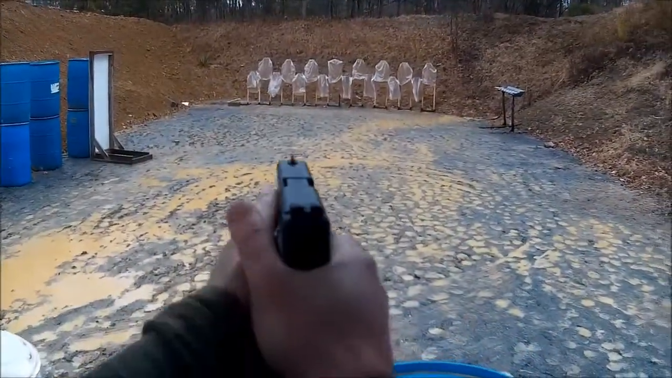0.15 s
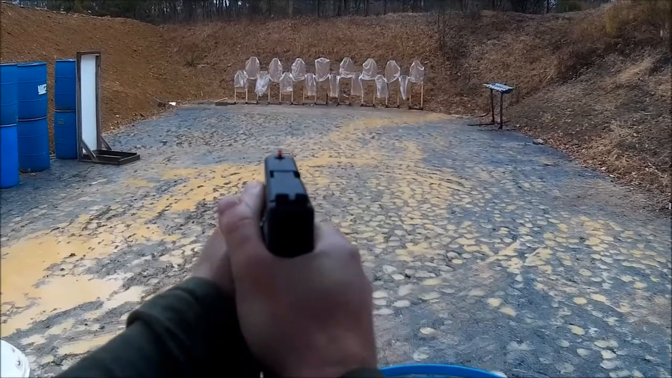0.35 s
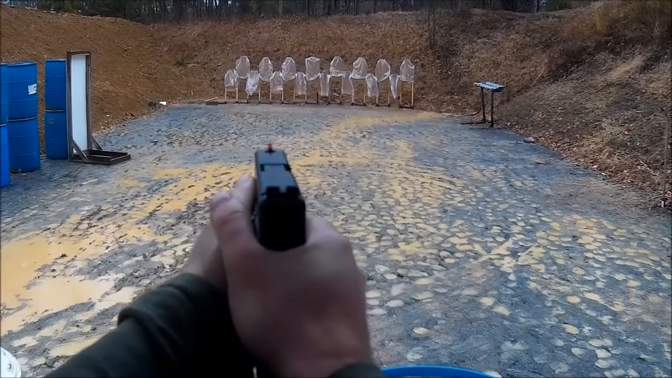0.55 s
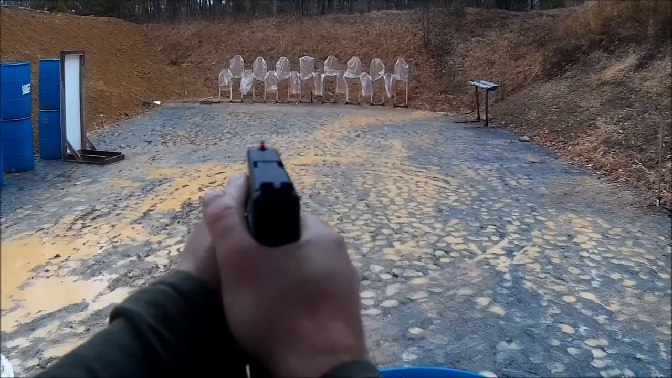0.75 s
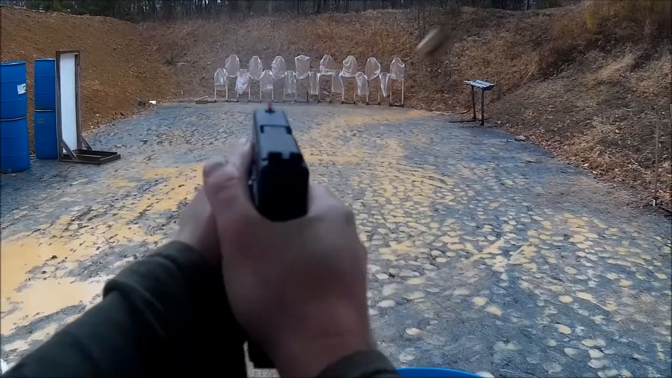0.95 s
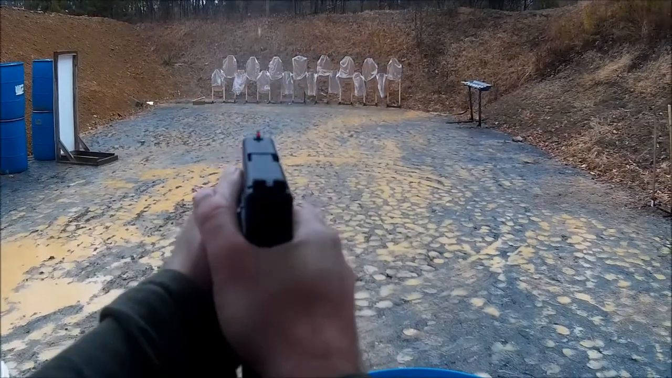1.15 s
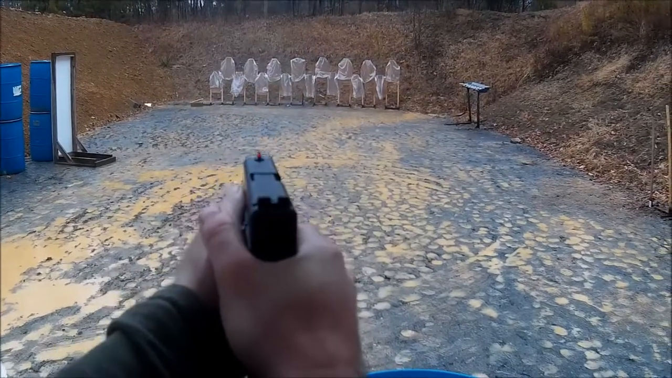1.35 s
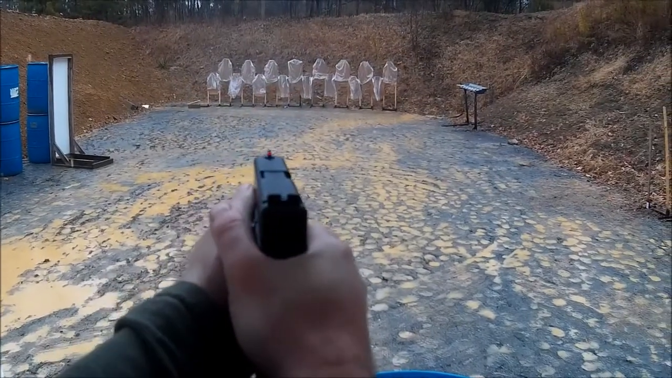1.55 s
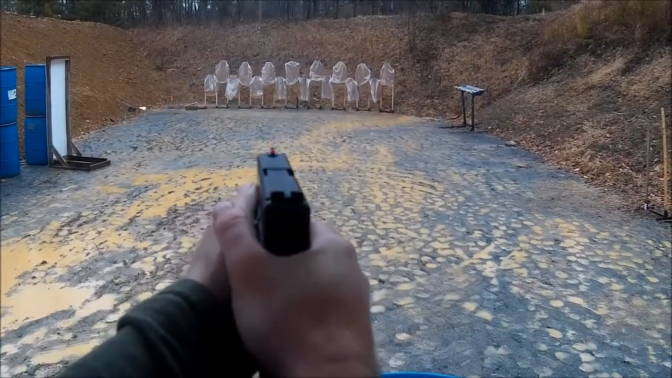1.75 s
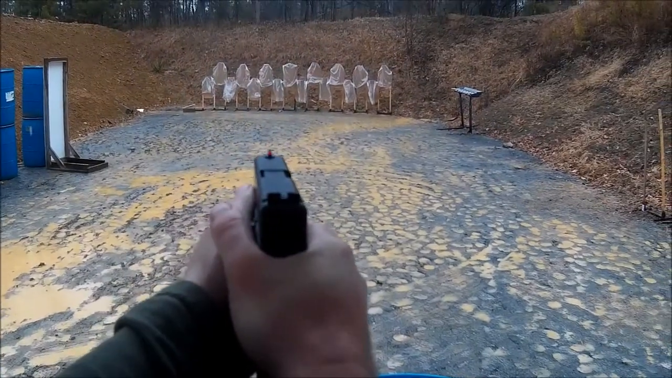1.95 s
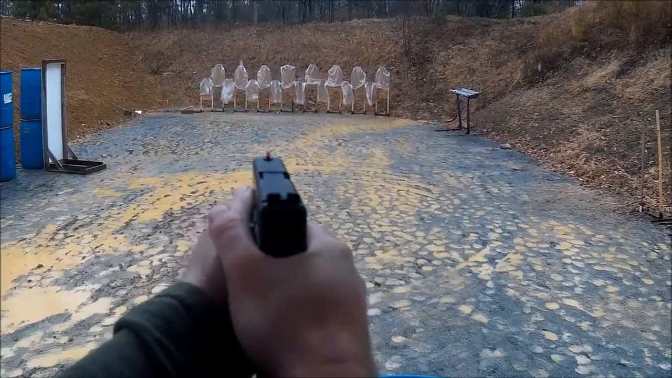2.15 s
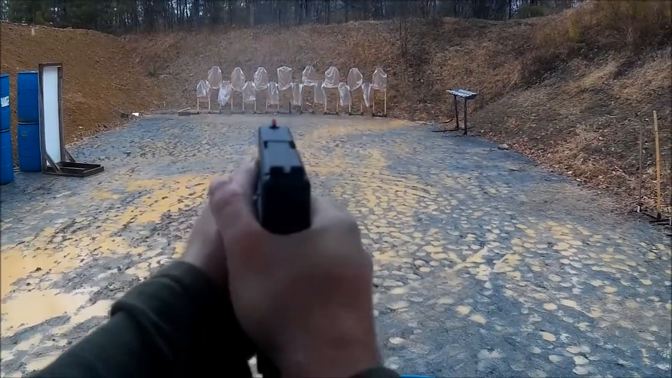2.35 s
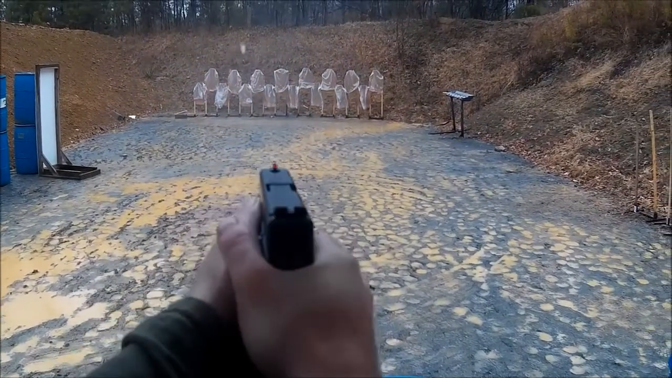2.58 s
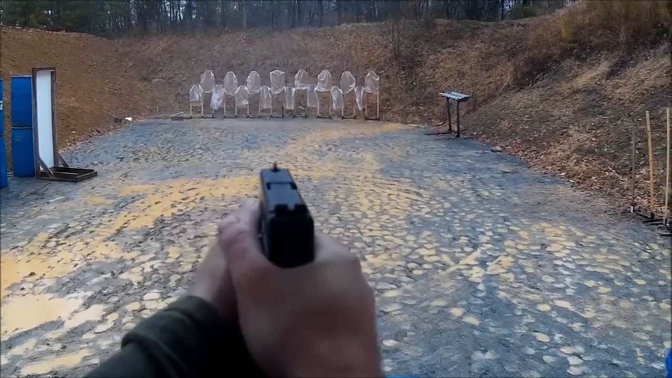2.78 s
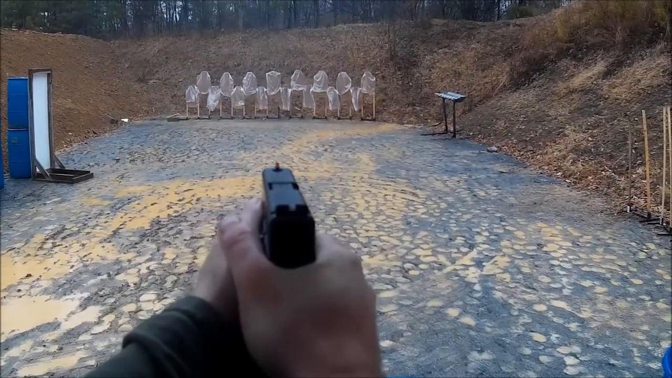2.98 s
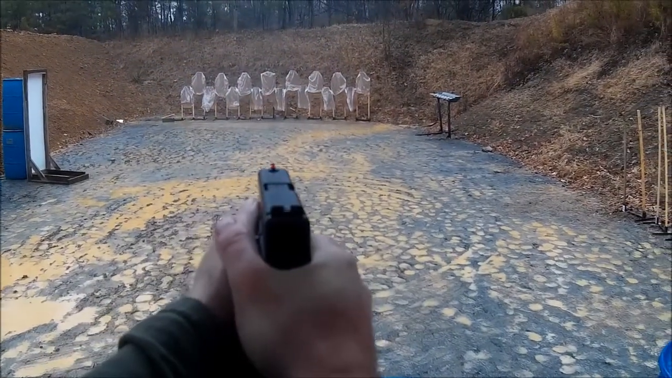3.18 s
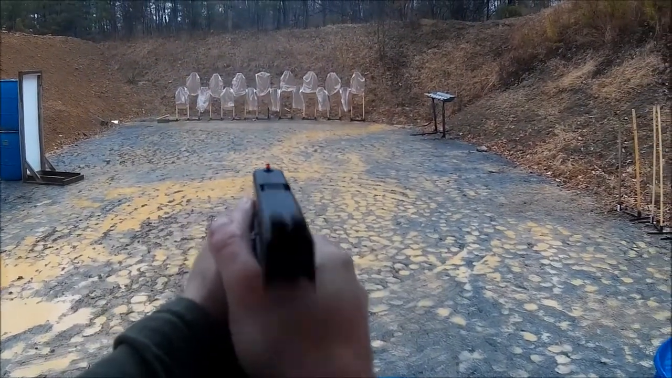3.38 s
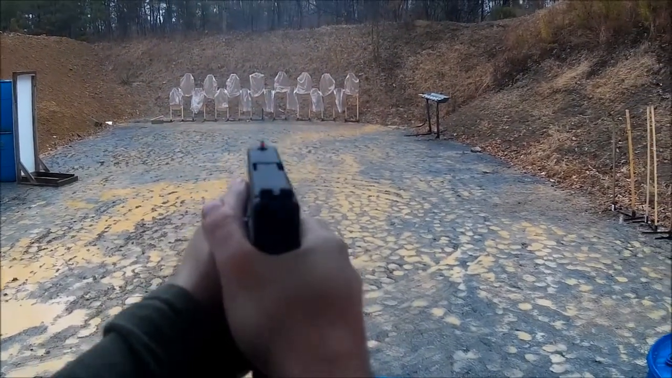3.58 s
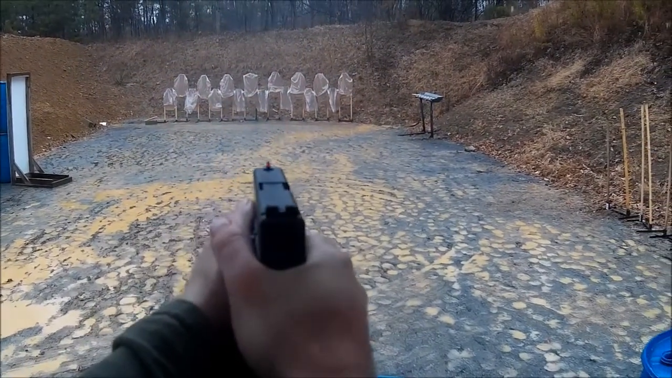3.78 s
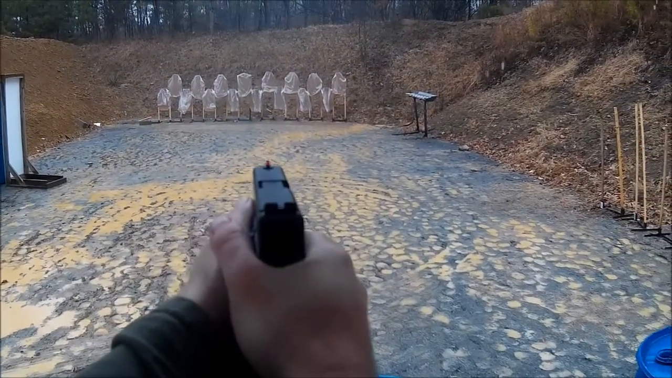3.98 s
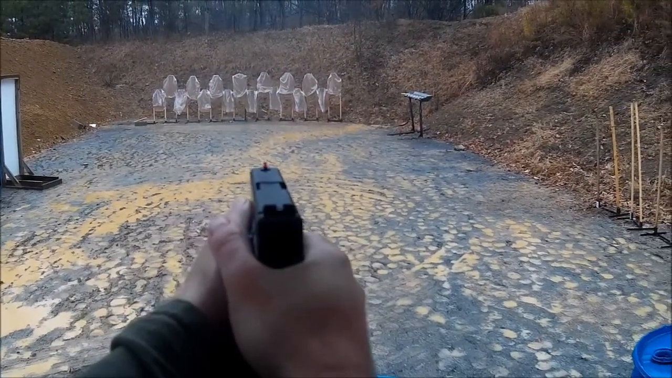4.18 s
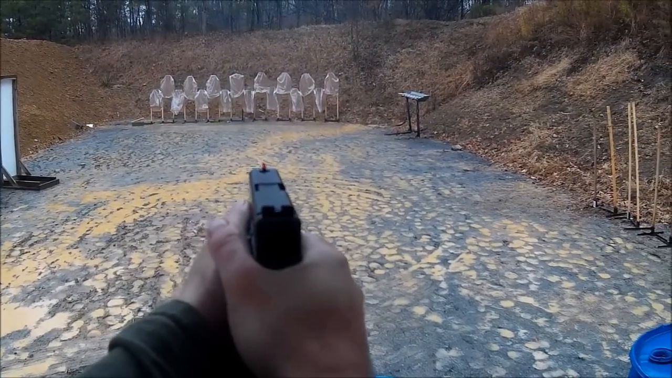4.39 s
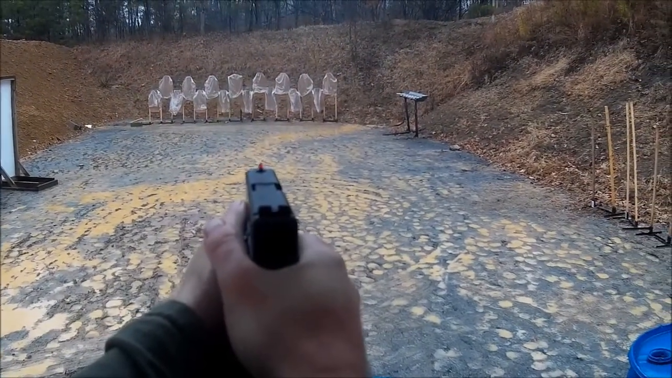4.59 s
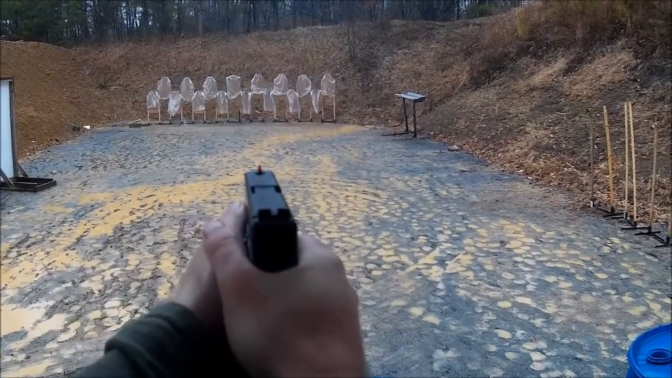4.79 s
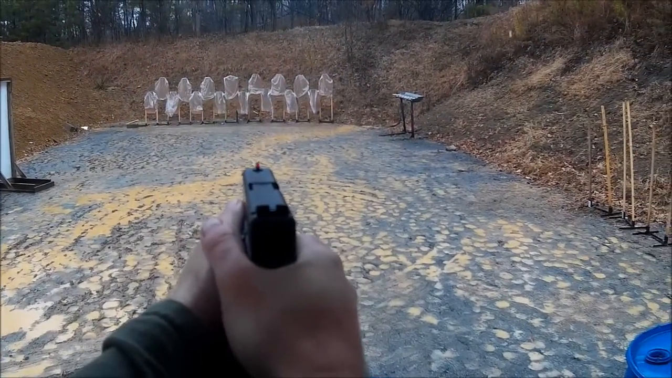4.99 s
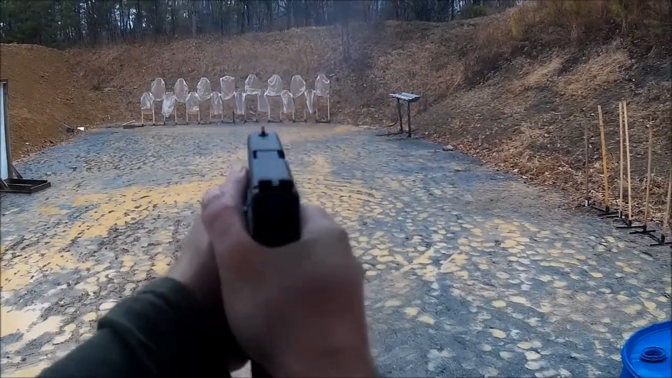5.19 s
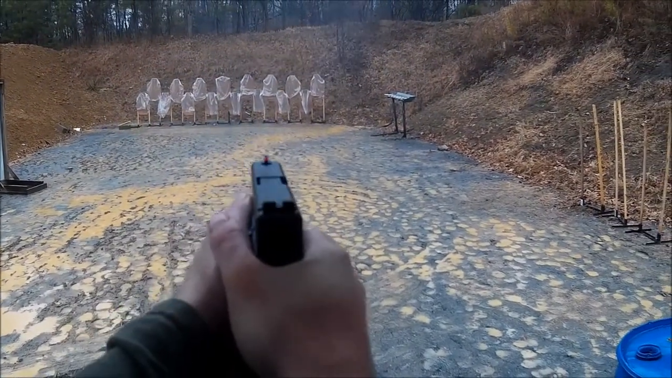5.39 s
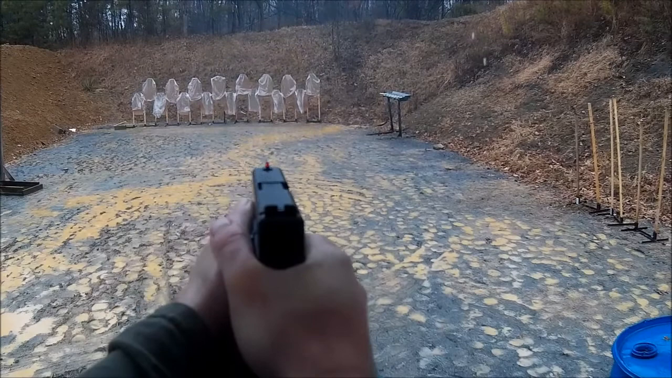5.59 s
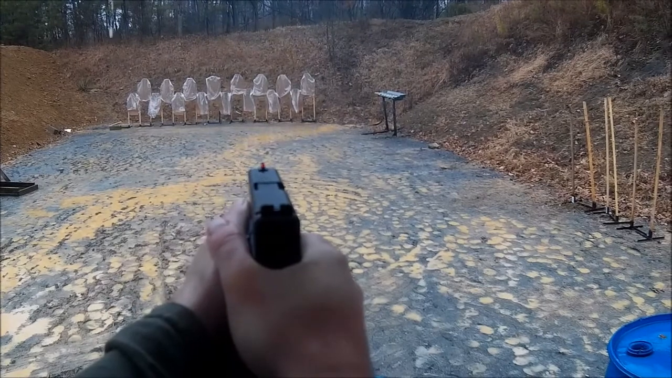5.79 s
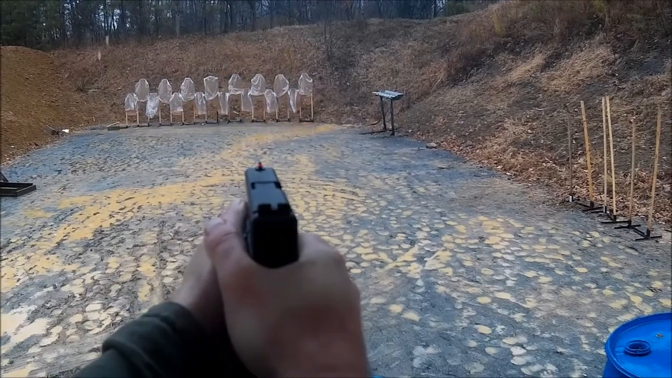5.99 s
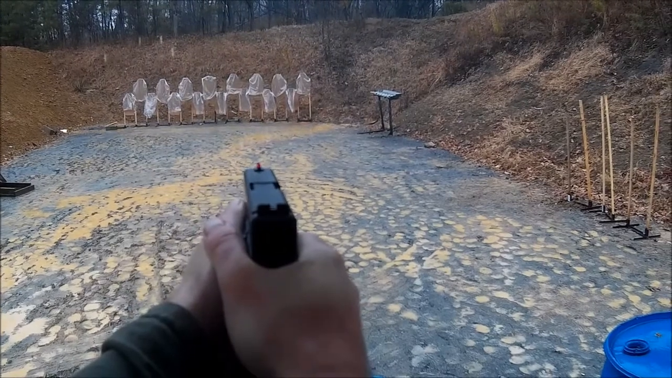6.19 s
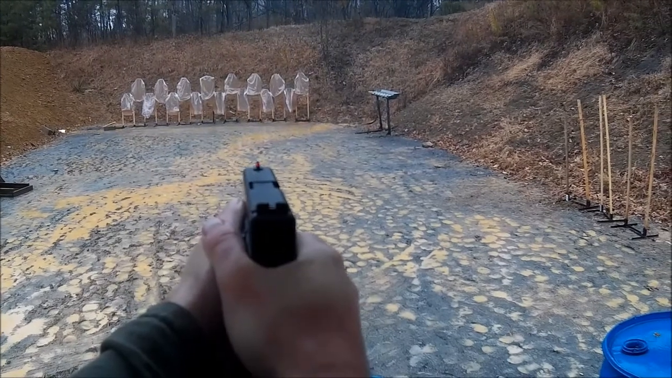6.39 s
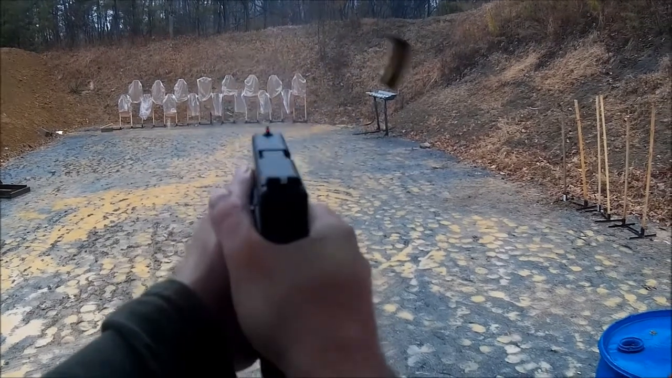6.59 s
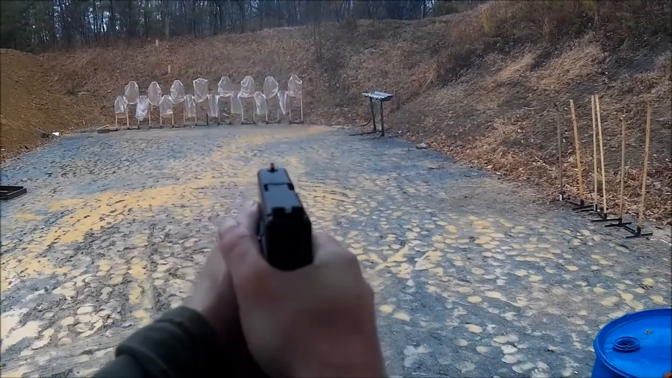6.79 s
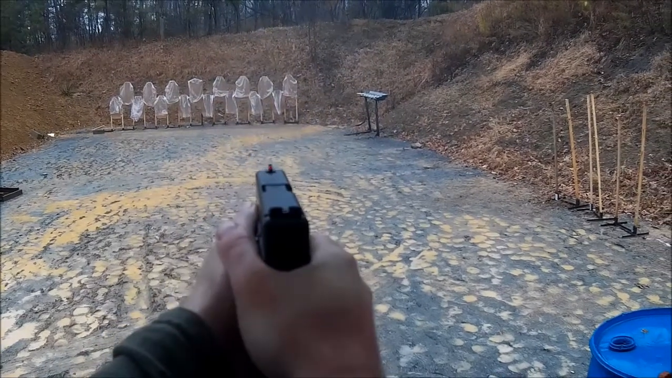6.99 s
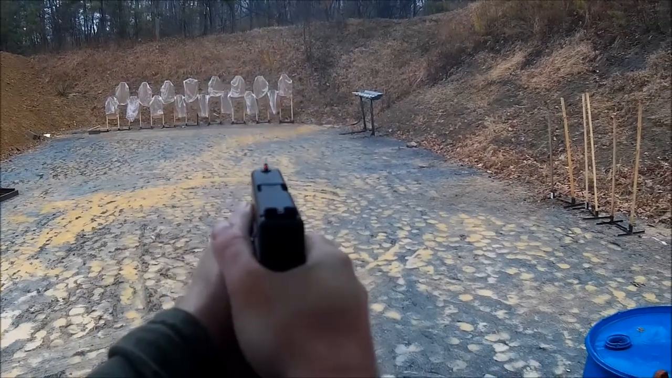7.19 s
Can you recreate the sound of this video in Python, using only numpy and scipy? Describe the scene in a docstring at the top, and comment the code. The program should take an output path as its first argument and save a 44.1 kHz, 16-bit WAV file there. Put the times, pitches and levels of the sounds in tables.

```python
"""A pistol fires five times in an earth-walled range bay, an arm's length from a microphone each blast overloads.
Each shot is a pressure pulse with damped ringing; banks, backstop and woods answer with shaped noise echoes.
A second gun beyond the side berm is a low-passed thump with dull returns, treetop hiss and a roll.
The trigger clicks as coloured noise over damped sines, and small noise bursts tick on the gravel.
Beneath lie a steady outdoor hush, a faint crackle and an uneven low rustle."""
import sys
import numpy as np
from scipy import signal
from scipy.fft import rfft, irfft, next_fast_len
from scipy.io import wavfile
from scipy.ndimage import uniform_filter1d, map_coordinates

SR = 44100
rng = np.random.default_rng(int(sys.argv[2]) if len(sys.argv) > 2 else 0)


def log_audio(samples):
    """Write samples as a 16-bit WAV file to the path given in sys.argv[1]."""
    # one column per channel
    frames = np.atleast_2d(samples).T
    # limit to full scale, then quantise
    limited = np.clip(frames, -1, 1)
    pcm = np.round(limited * 32767).astype(np.int16)
    wavfile.write(sys.argv[1], SR, pcm)


N = 319725
AGE = np.arange(int(1.4 * SR)) / SR  # time since a sound began [s]


def amp(db):
    """Logarithmic level: decibels to gain."""
    return 10 ** (np.asarray(db) / 20)


def add(track, s, sound):
    """Superposition: mix a sound into the track from time s, cut at the end of the track."""
    part = track[round(s * SR):][:len(sound)]
    part += sound[:len(part)]


def fade(t60):
    """Exponential damping: 60 dB down after t60 seconds."""
    return np.exp(-np.log(1000) * AGE / t60)


def rising(attack, start=0):
    """Smooth onset: a step from 0 to 1, beginning at start [s]."""
    return 1 - np.exp(-(np.maximum(AGE - start, 0) / attack) ** 2)


def swell(db, attack, hold, t60, delay=0):
    """Echo envelope: arrives after delay, builds up, holds until hold seconds after arrival, then decays."""
    dying = np.maximum(AGE - delay - hold, 0)
    return amp(db - 60 * dying / t60) * rising(attack, delay)


def wobble(rate, size=len(AGE)):
    """Random modulation: a smooth curve through rate random knots a second."""
    knots = rng.standard_normal(1024)
    return map_coordinates(knots, [np.arange(size) / SR * rate], mode="wrap")


# resonances and notches of the microphone housing: (frequency [Hz], width [Hz], gain [dB])
HOUSING_RESONANCES = [(243, 34, 3), (436, 42, -4.5), (610, 210, 4), (790, 60, -3.5), (1031, 72, 7.5),
                      (1590, 100, -4.5), (1976, 120, 7), (6300, 560, 4), (8400, 450, 2.5)]


def colour(tone, size, housing_share=1):
    """Linear filtering: gain at each frequency from a tone curve plus a share of the housing resonances."""
    hz = np.fft.rfftfreq(size, 1 / SR)
    points, db = np.transpose(tone)
    housing = sum(lift * np.exp(-.5 * ((hz - centre) / width) ** 2)
                  for centre, width, lift in HOUSING_RESONANCES)
    curve = np.interp(np.log(hz + 1), np.log(points + 1), db)
    return amp(curve + housing_share * housing)


def noise(tone, size=len(AGE), housing_share=1):
    """Filtered random noise: white noise given a colour, then scaled to rms 1."""
    spectrum = rfft(rng.standard_normal(size))
    x = irfft(spectrum * colour(tone, size, housing_share), size)
    return x / x.std()


def ringing(modes):
    """Modal superposition: damped sines struck together."""
    return sum(amp(db) * fade(t60) * np.sin(2 * np.pi * hz * AGE) for hz, db, t60 in modes)


def blast(push, rise):
    """Blast wave: a quick rise, a push lasting push seconds, then a longer suction; the peak is 1."""
    u = AGE / push
    wave = (1 - u) * np.exp(-u) * rising(rise)
    return wave / wave.max()


def echoes(level, tone, alike, lumpy_db, spiky_db, count):
    """Diffuse scattering: one echo per shot, clumped by banks, spiked by trunks, its pattern partly repeated."""
    arrived = rising(attack=0.0007) * (level > amp(-90))
    gain = level * amp(lumpy_db * wobble(rate=120))
    trunks = amp(spiky_db * np.clip(wobble(rate=700), -2, 2))
    # the ground stays put: alike is the share of the scattering power common to all shots
    share = np.clip(alike, 0, 1)
    common = rng.standard_normal(len(AGE))
    own = rng.standard_normal((count, len(AGE)))
    paths = np.sqrt(share) * common + np.sqrt(1 - share) * own
    # even a short burst holds every frequency: level it out before it takes its colour
    spectrum = rfft(gain * trunks * paths)
    spectrum /= np.sqrt(np.abs(uniform_filter1d(np.abs(spectrum) ** 2, size=300)) + 1e-20)
    echo = irfft(spectrum * colour(tone, len(AGE)), len(AGE)) * arrived
    # each echo keeps the energy of its envelope
    return echo * np.linalg.norm(gain) / np.linalg.norm(echo, axis=1, keepdims=True)


# spectrum of the outdoor hush: (frequency [Hz], relative level [dB])
HUSH_TONE = [(15, -40), (25, -9.5), (43, -18.5), (59, -2), (79, -4.5), (169, -5.5), (313, -5), (445, -12.5),
             (826, -17), (1020, -10.5), (1660, -26), (1850, -16), (4260, -29), (9550, -32), (15500, -32)]


def air():
    """Stationary noise: a quiet outdoor hush with a faint crackle and an uneven low rustle."""
    ticks = (rng.random(N) < 45 / SR) * rng.random(N)  # 45 a second on average
    crackle = signal.fftconvolve(ticks, fade(0.012))[:N] * noise(GRIT_TONE, size=N)
    rustle = noise(THUD_TONE, size=N) * amp(4.4 * wobble(rate=16, size=N))
    hush = noise(HUSH_TONE, size=N, housing_share=0)
    return amp(-56.5) * hush + amp(-52) * crackle + amp(-64.5) * rustle


# shots beyond the side berm: (time [s], thump level [dB], echo level [dB])
NEIGHBOUR_SHOTS = [(0.143, -17, -1.5), (1.2212, -12, -0.5), (1.908, -17.5, -2.5), (3.096, -17.5, -3)]
# modes of the blast, before the berm's shadow filter: (frequency [Hz], level [dB], t60 [s])
THUMP_MODES = [(82, -2, 0.086), (160, -13, 0.077), (321, -4, 0.062), (594, -13, 0.027), (940, -11, 0.02)]
# dull returns from far banks: (delay [s], level [dB])
FAR_RETURNS = [(0.149, -22), (.226, -21), (0.391, -29.5)]
# modes of those banks: (frequency [Hz], level [dB], t60 [s])
BANK_MODES = [(300, -1, .07), (440, -2.5, .05), (605, -6.5, 0.031)]
# spectrum of the neighbour's brush and woods echoes: (frequency [Hz], relative level [dB])
FAR_WOODS_TONE = [(24, -47.5), (40, -19), (113, -12), (313, 0.5), (824, -7.5), (1000, -11.5), (1570, -15),
                  (2010, -15.5), (2920, -20.5), (5160, -32), (5700, -27.5), (9360, -49), (15000, -52.5)]
# spectrum of the treetop echo: (frequency [Hz], relative level [dB])
TREETOP_TONE = [(60, -20.5), (250, -4.5), (600, -1), (1000, -3.5), (1600, -11.5), (2100, -6), (4000, -15),
                (6300, -17.5), (9000, -31), (11000, -37.5), (15000, -44)]
TREES_DELAY = 0.009  # extra travel time by way of the trees [s]


def neighbour():
    """Diffraction: only a dull thump bends over the berm; treetops return the treble later, then woods roll."""
    count = len(NEIGHBOUR_SHOTS)
    shadow = signal.butter(8, 1000, fs=SR, output="sos")  # low-pass at 1000 Hz
    thump = signal.sosfilt(shadow, blast(push=0.0012, rise=0.00053) + ringing(THUMP_MODES))
    returns = np.zeros(len(AGE))
    for delay, db in FAR_RETURNS:
        add(returns, delay, amp(db) * ringing(BANK_MODES) * rising(0.001))
    # brush on top of the berm scatters a little of the thump at once
    brush = swell(db=-23, attack=0.0053, hold=0.024, t60=0.2)
    spills = echoes(brush, FAR_WOODS_TONE, alike=0.47, lumpy_db=3.3, spiky_db=5.0, count=count)
    treetops = swell(db=-18.0, attack=.02, hold=.07, t60=0.37)
    bright = echoes(treetops, TREETOP_TONE, alike=.7, lumpy_db=0.6, spiky_db=1.3, count=count)
    # the edge of the woods holds and falls; the deep woods roll on
    edge = swell(db=-33.5, attack=.035, hold=0.26, t60=.85)
    deep_woods = swell(db=-53, attack=.3, hold=.55, t60=1.7)
    rolls = echoes(edge + deep_woods, FAR_WOODS_TONE, alike=0.53, lumpy_db=1.1, spiky_db=1.0, count=count)
    out = np.zeros(N)
    for (s, thump_db, echo_db), spill, hiss, roll in zip(NEIGHBOUR_SHOTS, spills, bright, rolls):
        add(out, s, amp(thump_db) * (thump + spill) + amp(echo_db) * returns)
        add(out, s + TREES_DELAY, amp(thump_db) * hiss + amp(echo_db) * roll)
    return out


# stray of each ring mode from shot to shot as the gun and hands move [dB], [share of its pitch]
RING_SCATTER_DB, RING_DETUNE = 2, 0.02


def strayed(modes):
    """Modal perturbation: the same modes, each a little off in pitch and level."""
    chance = rng.standard_normal((len(modes), 2))
    return [(hz * (1 + RING_DETUNE * a), db + RING_SCATTER_DB * b, t60)
            for (hz, db, t60), (a, b) in zip(modes, chance)]


# the pistol's shots: (time [s], strength [dB])
PISTOL_SHOTS = [(0.879, -1), (2.2286, -1), (3.3965, -1.5), (5.0403, -1), (6.44, -1)]
# mean modes that ring close by: (frequency [Hz], level [dB], t60 [s])
RING_MODES = [(219.7, -1.5, 0.093), (502.5, 13, 0.041), (622, 3, 0.046), (981, 11, 0.045),
              (1302, 2.5, 0.034), (1979, 9.5, 0.042), (3298, 4, 0.039)]
# single hard reflections inside the bay: (delay [s], level [dB])
BAY_SLAPS = [(.0305, -10), (.0428, -13)]
# spectrum of the scatter off the ground at the shooter's feet: (frequency [Hz], relative level [dB])
FLASH_TONE = [(40, -6.5), (230, -4.5), (750, -4.5), (1100, -4), (2000, -8), (3500, -10), (5000, -15),
              (8000, -25), (15000, -37)]
# spectrum of the near wall and the wash: (frequency [Hz], relative level [dB])
BAY_TONE = [(30, -21), (130, -20.5), (200, -6), (270, 0), (350, -8.5), (450, -12.5), (600, -11.5),
            (1050, -12), (1400, -15), (2200, -17.5), (3400, -18), (6300, -23), (10000, -37.5), (15500, -52)]
# spectrum of the bare earth of backstop and far wall: (frequency [Hz], relative level [dB])
BACKSTOP_TONE = [(24, -38.5), (40, -35), (59, -14.5), (257, -2.5), (422, -9), (541, -8.5), (804, -17),
                 (956, -13.5), (1650, -13.5), (1960, -18.5), (3560, -30.5), (6460, -31), (15000, -56.5)]
# spectrum of the woods: (frequency [Hz], relative level [dB])
WOODS_TONE = [(24, -63), (40, -28.5), (156, -24.5), (206, -5.5), (270, -1), (443, -4), (627, -3.5),
              (784, -9), (1060, -10.5), (1570, -14.5), (2010, -17), (2340, -18.5), (3650, -27), (5850, -31),
              (15000, -68.5)]
# travel times of the echoes from the far side wall, the woods and the backstop [s]
FAR_WALL_DELAY, WOODS_DELAY, BACKSTOP_DELAY = .043, 0.065, .1128


def pistol():
    """Blast and reverberation: each shot rings close by, slaps around the bay and rolls through the woods."""
    count = len(PISTOL_SHOTS)
    direct = amp(10.5) * blast(push=0.00033, rise=.0001)
    # a slow pressure swing as the overloaded microphone recovers
    direct += amp(-7) * blast(push=.011, rise=.002)
    for delay, db in BAY_SLAPS:
        add(direct, delay, amp(db) * blast(push=.0011, rise=.0004))
    # the earth banks send back a low boom
    boom = fade(0.22) * rising(0.003) * np.sin(2 * np.pi * 125 * AGE)
    add(direct, .145, amp(-30.0) * boom)
    # the ground at the shooter's feet scatters the blast at once
    flash = swell(db=16.0, attack=0.00052, hold=0.00053, t60=.031)
    near = echoes(flash, FLASH_TONE, alike=.6, lumpy_db=1.5, spiky_db=1.5, count=count)
    # near wall, far wall, and a weak wash between the two
    near_wall = swell(db=-10, attack=.0007, hold=0.02, t60=.17)
    far_wall = swell(db=-19, attack=.002, hold=.018, t60=.06, delay=FAR_WALL_DELAY)
    wash = swell(db=-36, attack=0.13, hold=0.21, t60=.8)
    walls = echoes(near_wall + wash, BAY_TONE, alike=0.72, lumpy_db=0.22, spiky_db=1.0, count=count)
    # the far wall is bare earth, as dull as the backstop
    walls += echoes(far_wall, BACKSTOP_TONE, alike=.75, lumpy_db=0.26, spiky_db=2.5, count=count)
    # the backstop's face gives a crack, its slope a longer spray
    face = swell(db=-28.0, attack=.0007, hold=0.0057, t60=0.066)
    slope = swell(db=-30.5, attack=.0007, hold=0.07, t60=0.77)
    backstop = echoes(face + slope, BACKSTOP_TONE, alike=0.73, lumpy_db=0.6, spiky_db=1.0, count=count)
    # the edge of the woods swells and falls; the deep woods roll on
    edge = swell(db=-25.5, attack=.135, hold=0.23, t60=0.79)
    deep_woods = swell(db=-45.5, attack=0.39, hold=0.42, t60=1.7)
    woods = echoes(edge + deep_woods, WOODS_TONE, alike=.8, lumpy_db=1.64, spiky_db=1.5, count=count)
    out = np.zeros(N)
    for (s, db), scatter, answer, roll in zip(PISTOL_SHOTS, near + walls, backstop, woods):
        add(out, s, amp(db) * (direct + ringing(strayed(RING_MODES)) + scatter))
        add(out, s + BACKSTOP_DELAY, amp(db) * answer)
        add(out, s + WOODS_DELAY, amp(db) * roll)
    return out


# trigger clicks: (time [s], click level [dB], frame ring level [dB])
TRIGGER_CLICKS = [(2.7492, -32.5, -30), (4.575, -40, -37.5), (6.042, -38, -39), (6.8004, -30.5, -28)]
# spectrum of the steel click: (frequency [Hz], relative level [dB])
CLICK_TONE = [(1000, -36), (1700, -22), (2200, 2), (3200, -7), (4500, -4.5), (5600, 2), (7900, -4),
              (8900, -22), (11500, -34), (13000, -15), (15500, -30)]
# modes of the pistol's frame: (frequency [Hz], relative level [dB], t60 [s])
FRAME_MODES = [(2045, -5, 0.034), (2120, 1, 0.026), (2398, -7, 0.027), (5670, -11, .03), (6500, -12, .03)]


def trigger():
    """Impact excitation: a sharp steel click rings the frame, with a short rattle behind it."""
    out = np.zeros(N)
    for s, db, ring_db in TRIGGER_CLICKS:
        click_and_rattle = fade(0.016) + amp(-12.5) * fade(0.11)
        click = noise(CLICK_TONE, housing_share=0) * click_and_rattle
        add(out, s, rising(0.00092) * (amp(db) * click + amp(ring_db) * ringing(FRAME_MODES)))
    return out


# ticks and scuffs on the gravel: (time [s], grit level [dB], thud level [dB])
GRAVEL_SCUFFS = [(3.926, -43, -55), (4.381, -55, -41), (4.403, -47, -41.5), (4.494, -51, -38.5),
                 (4.756, -50, -50), (5.835, -46.5, -43), (6.005, -56, -46), (6.182, -47.5, -45)]
# spectrum of the grit, also of the air's crackle: (frequency [Hz], relative level [dB])
GRIT_TONE = [(300, 2), (1000, -3), (2200, 7), (4000, -6.5), (6500, -9.5), (10000, -28)]
# spectrum of the thud, also of the air's rustle: (frequency [Hz], relative level [dB])
THUD_TONE = [(40, -20), (220, 2), (500, -10), (1100, -13), (2500, -46.5)]


def gravel():
    """Contact noise: small touches on the ground give a gritty tick over a soft thud."""
    out = np.zeros(N)
    for s, grit_db, thud_db in GRAVEL_SCUFFS:
        grit = amp(grit_db) * noise(GRIT_TONE) * fade(0.033)
        thud = amp(thud_db) * noise(THUD_TONE) * fade(0.062)
        add(out, s, rising(0.0015) * (grit + thud))
    return out


def scene():
    """Superposition: both guns and the small sounds at one microphone."""
    return (air() + neighbour() + pistol() + trigger() + gravel())[None]


TOP_HZ = 15700  # band limit [Hz]


def record(dry):
    """Saturation and band limiting: blasts flatten near full scale, then a steep low-pass cuts the top."""
    clipped = amp(-.4) * dry / (1 + np.abs(dry) ** 8) ** (1 / 8)
    size = next_fast_len(N + SR)
    hz = np.fft.rfftfreq(size, 1 / SR)
    passband = 1 / np.sqrt(1 + (hz / TOP_HZ) ** 120)
    return irfft(rfft(clipped, size) * passband, size)[:, :N]


dry = scene()
out = record(dry)
log_audio(out)
```